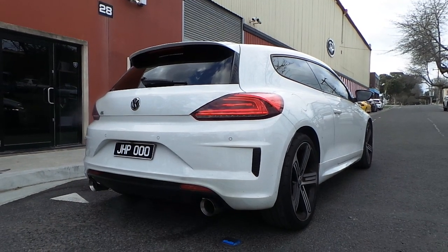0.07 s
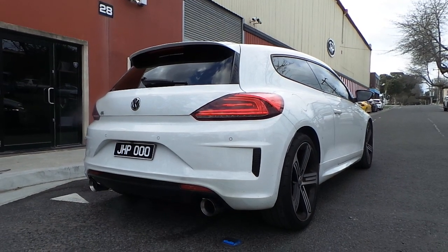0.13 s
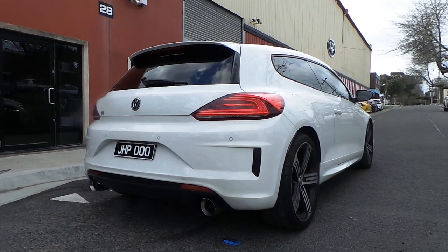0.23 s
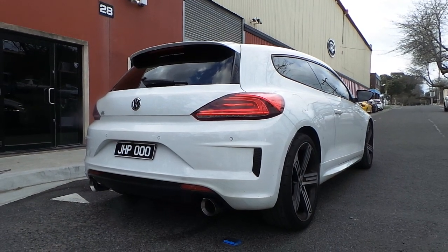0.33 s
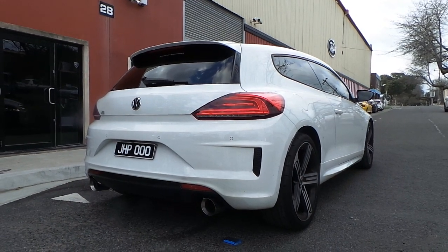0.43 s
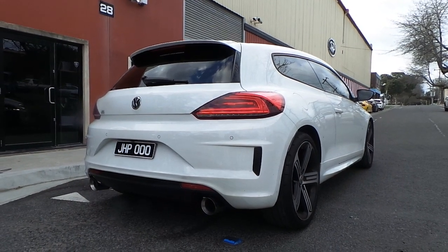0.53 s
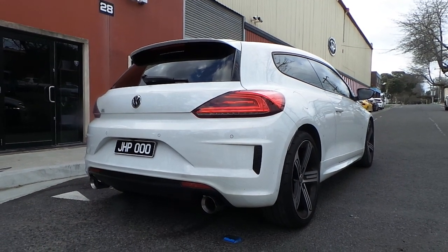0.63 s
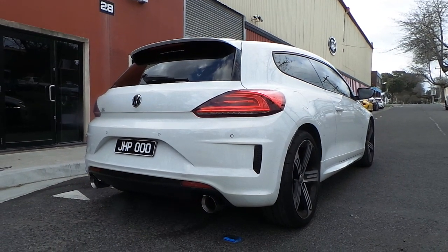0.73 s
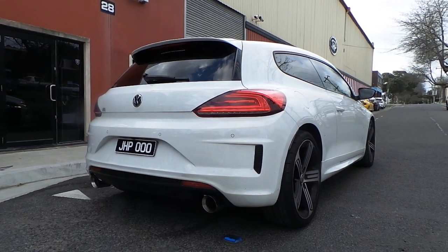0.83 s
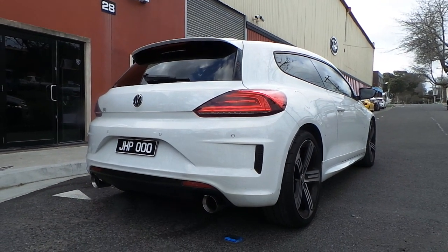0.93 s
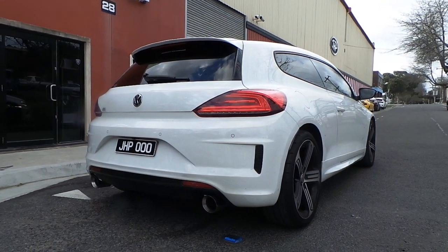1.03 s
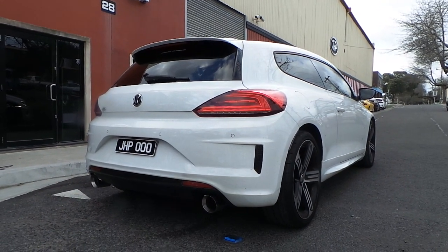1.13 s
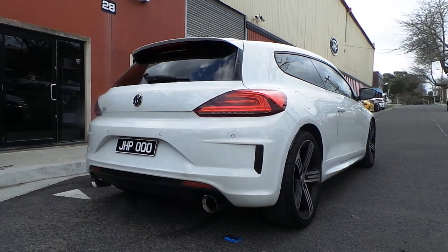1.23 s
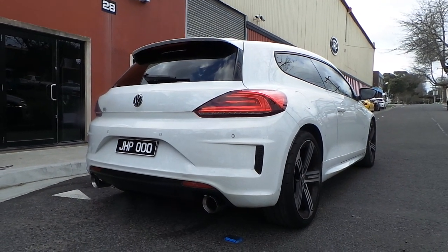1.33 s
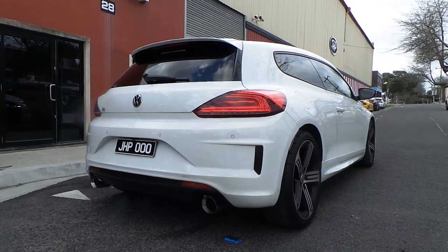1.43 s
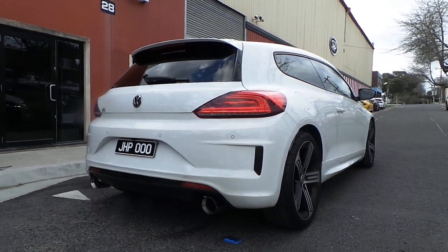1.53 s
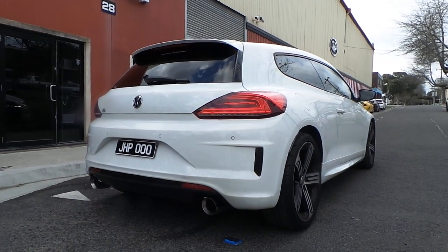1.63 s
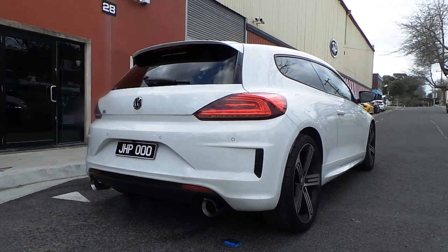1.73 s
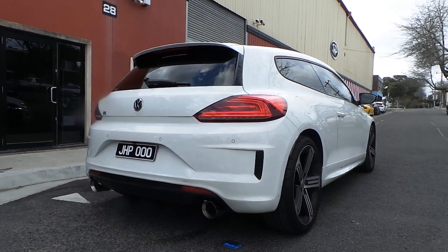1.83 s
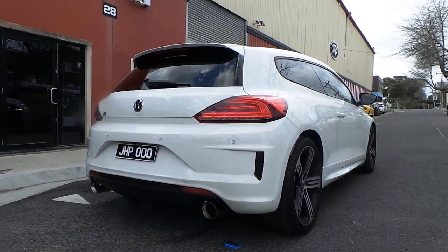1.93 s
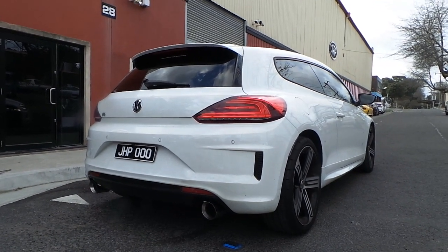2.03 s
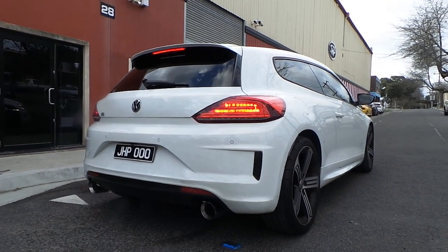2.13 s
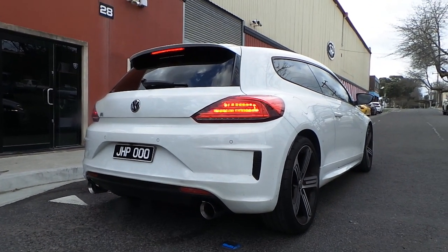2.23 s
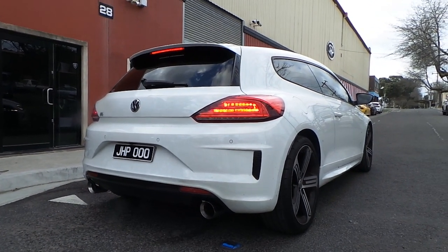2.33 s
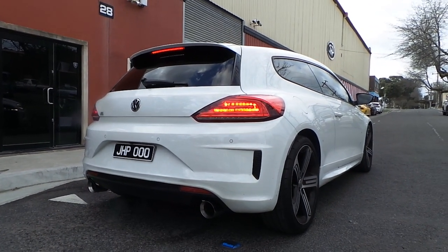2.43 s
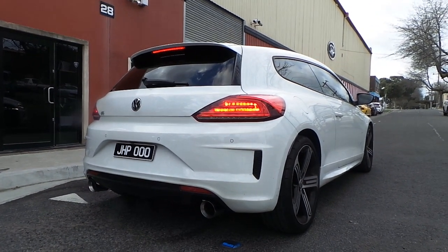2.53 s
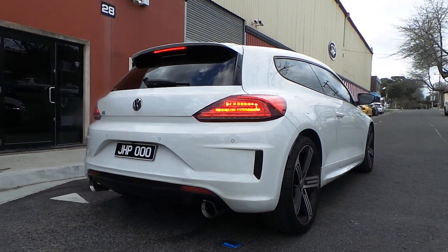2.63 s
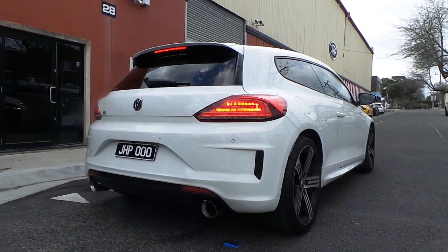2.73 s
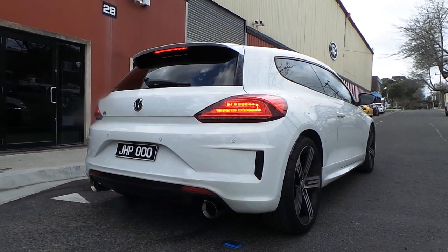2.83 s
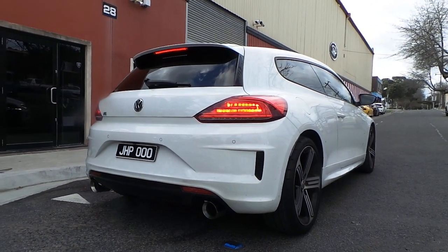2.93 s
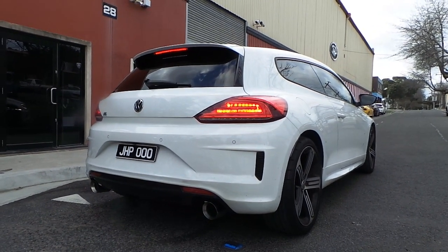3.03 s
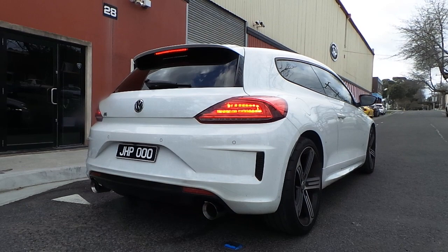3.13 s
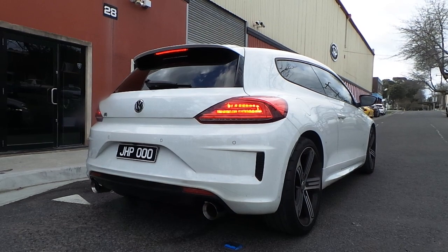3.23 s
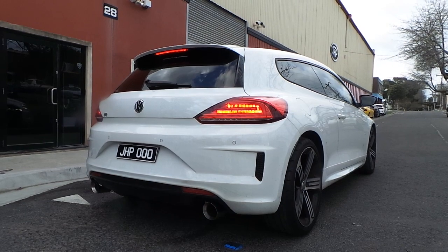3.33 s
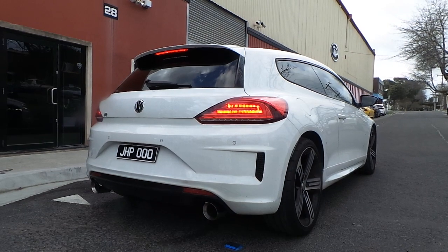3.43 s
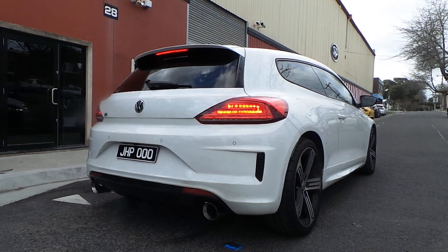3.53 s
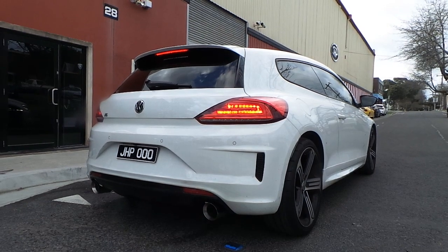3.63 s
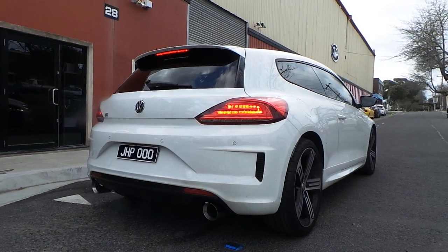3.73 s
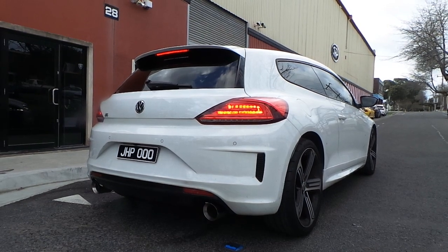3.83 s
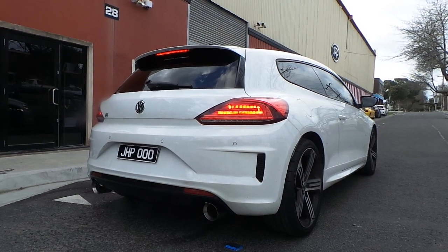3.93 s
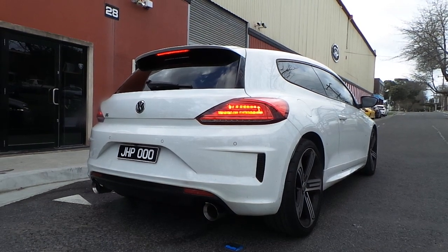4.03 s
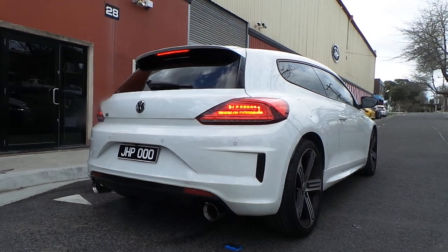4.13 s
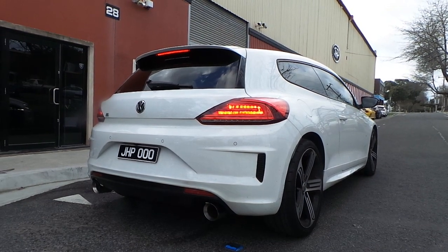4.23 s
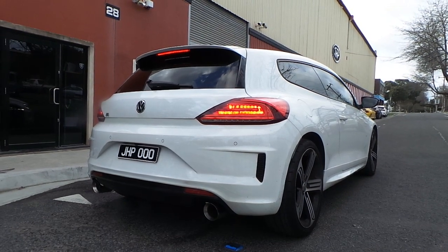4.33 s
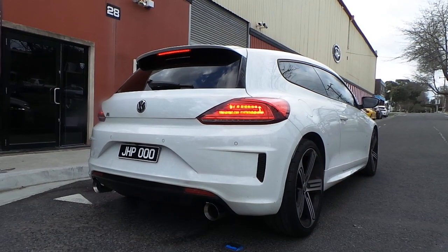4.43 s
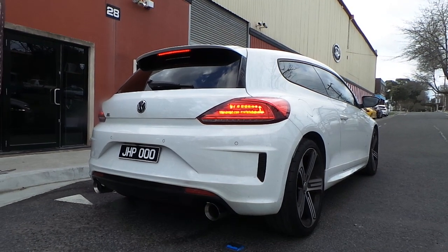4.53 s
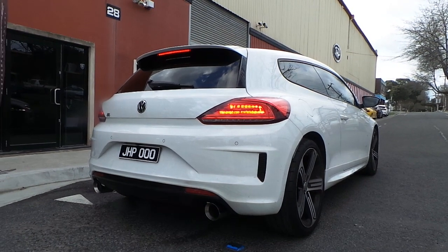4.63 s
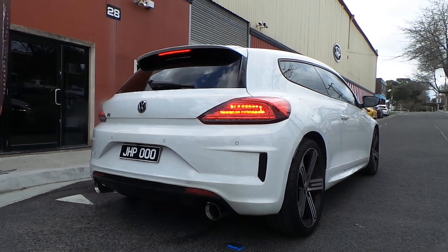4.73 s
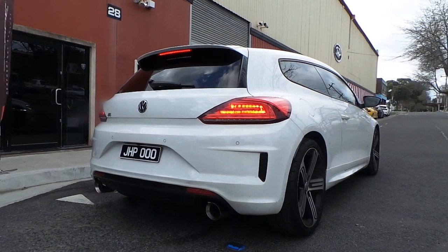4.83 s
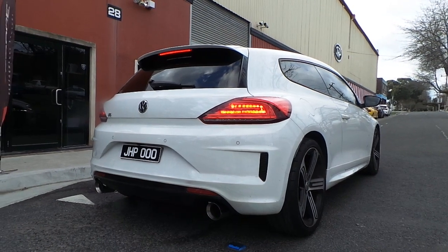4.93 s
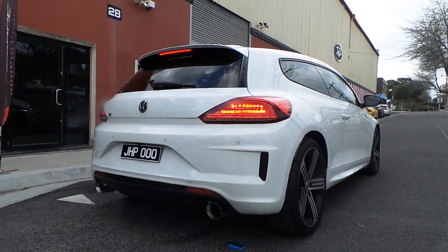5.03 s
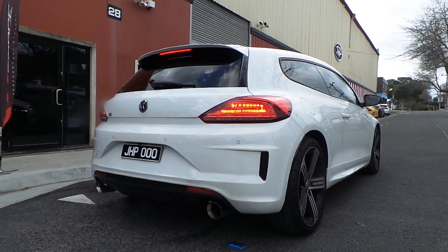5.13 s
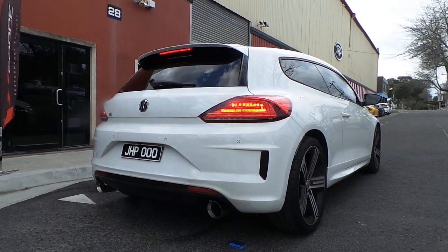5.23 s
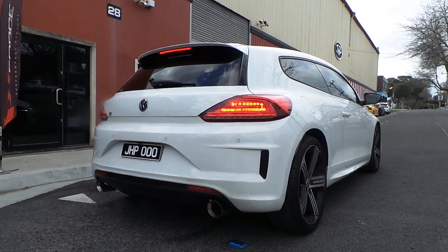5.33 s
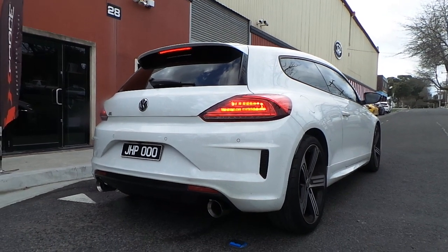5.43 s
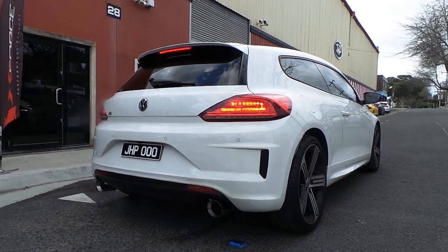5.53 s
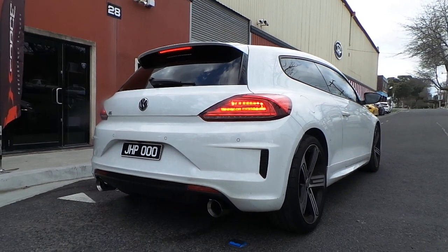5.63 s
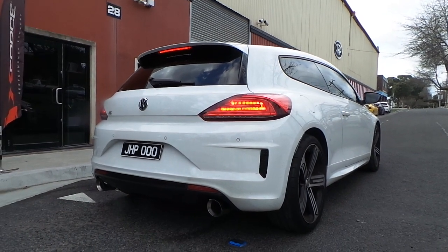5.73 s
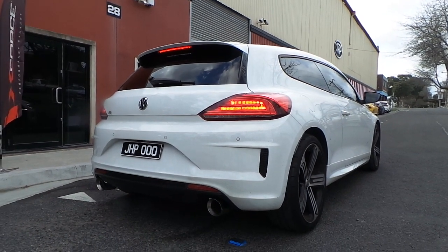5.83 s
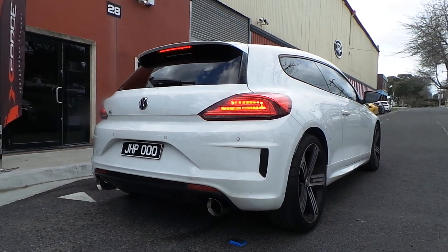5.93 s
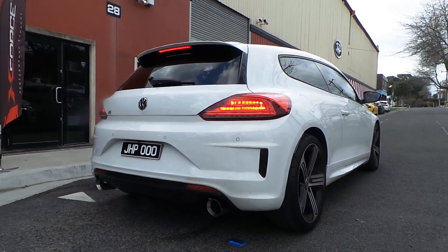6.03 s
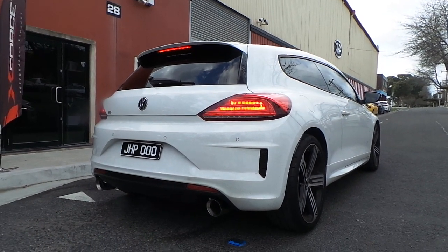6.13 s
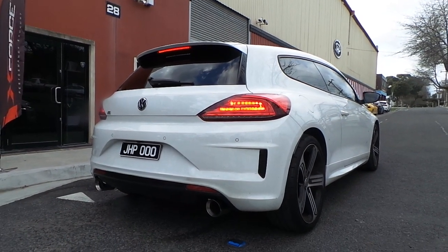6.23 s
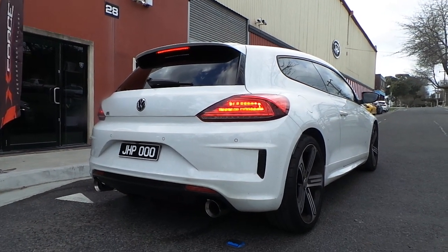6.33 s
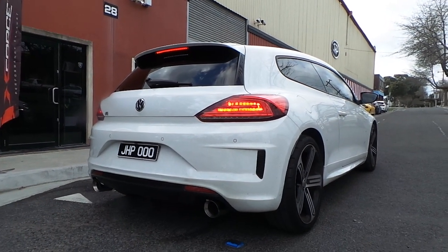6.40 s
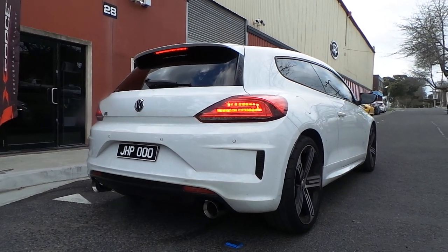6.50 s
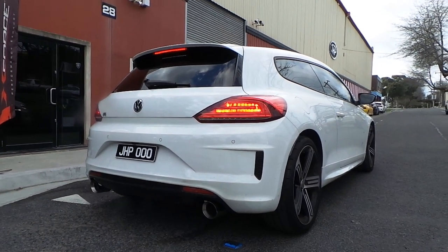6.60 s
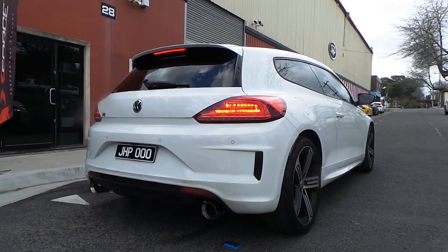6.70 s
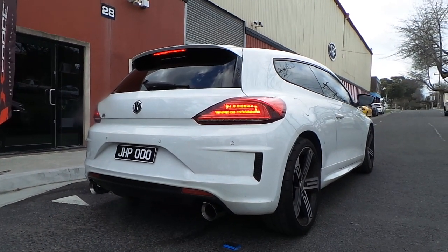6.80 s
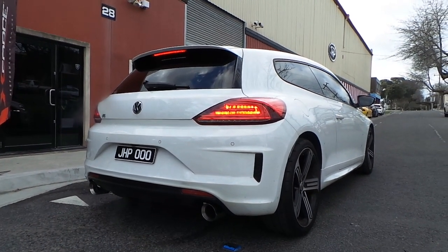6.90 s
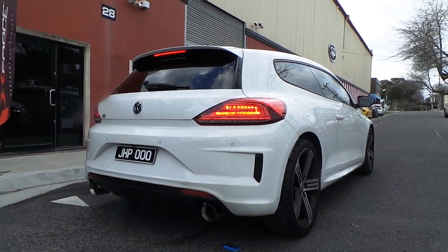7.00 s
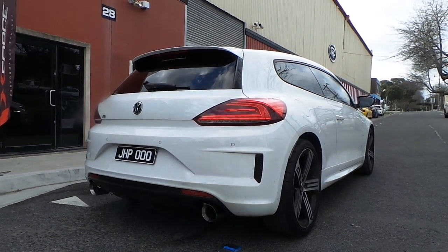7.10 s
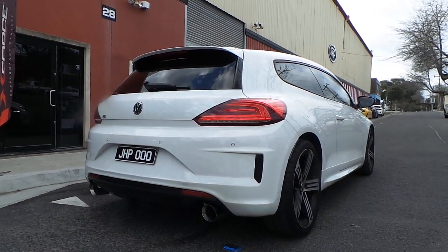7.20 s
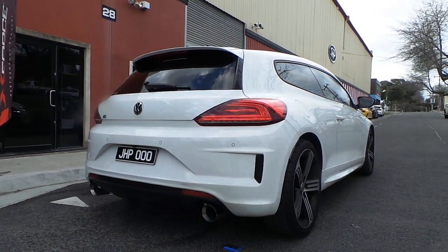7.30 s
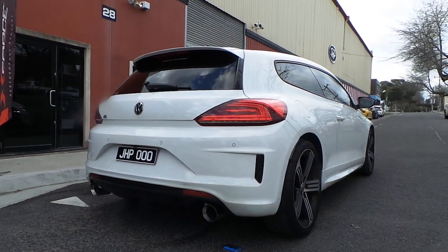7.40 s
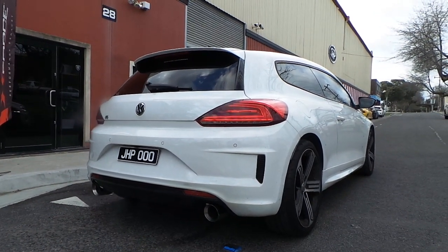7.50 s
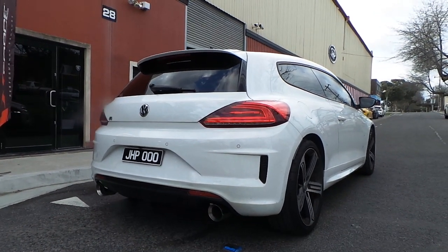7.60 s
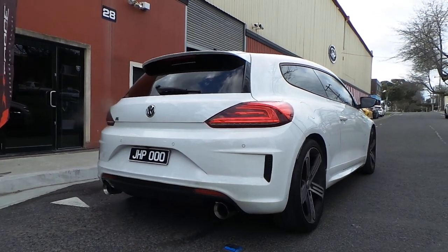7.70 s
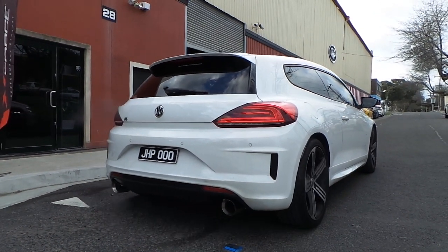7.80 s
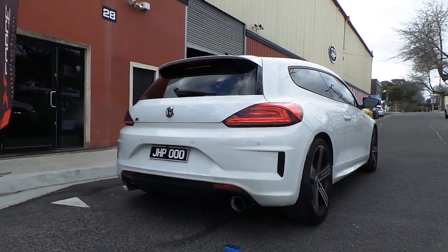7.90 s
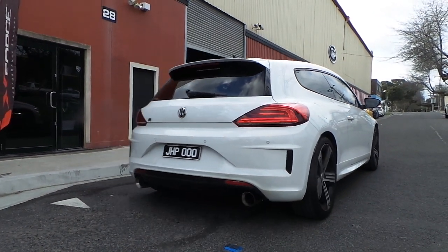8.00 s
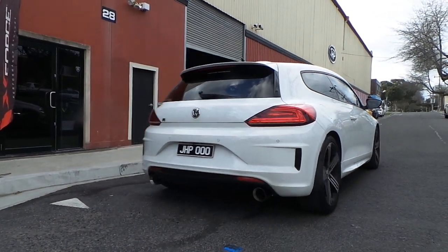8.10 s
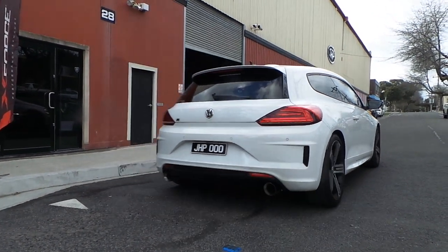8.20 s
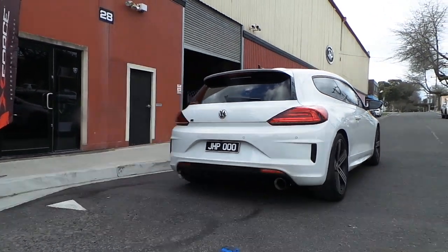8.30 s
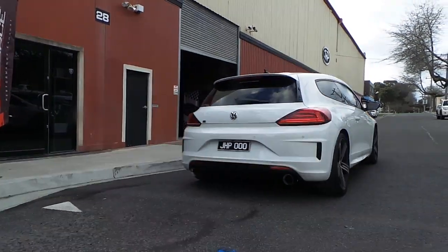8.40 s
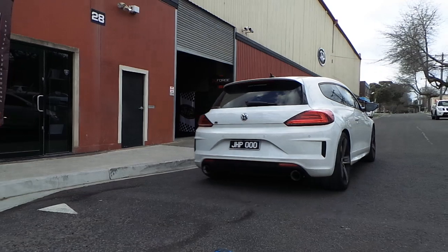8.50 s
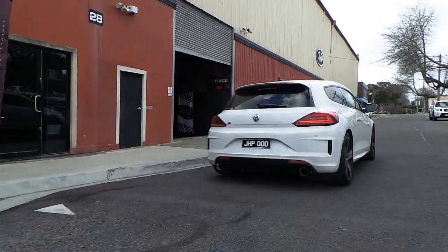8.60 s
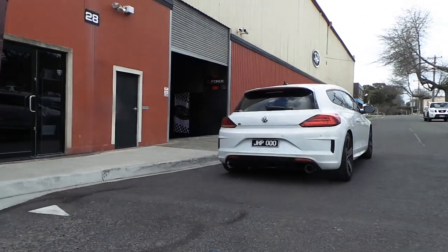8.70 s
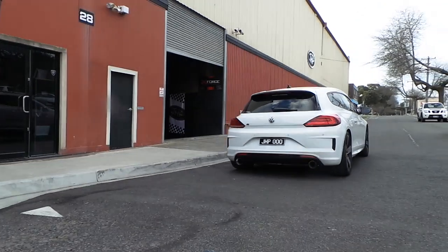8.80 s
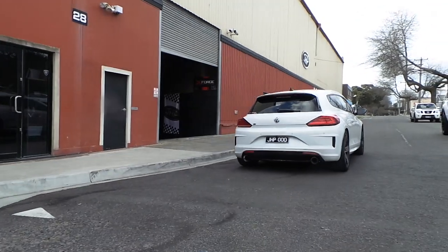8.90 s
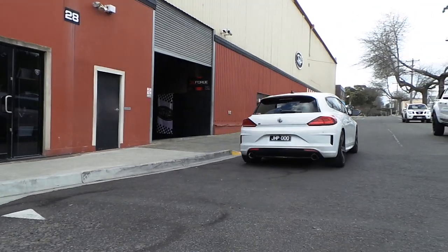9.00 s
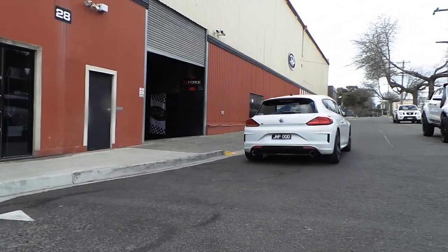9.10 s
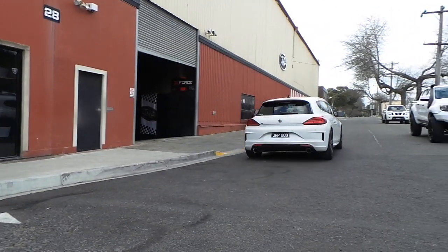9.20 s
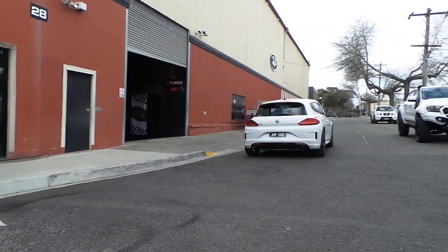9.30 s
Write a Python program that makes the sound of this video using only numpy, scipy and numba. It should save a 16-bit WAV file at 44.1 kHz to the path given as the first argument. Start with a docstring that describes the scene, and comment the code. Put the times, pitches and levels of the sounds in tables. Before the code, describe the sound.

Heard from behind, a hatchback putters at idle in the street, a gear knocks in, revs rise, and it accelerates off with a throaty rasp.

```python
"""First comes the uneven putter of a four-cylinder hatchback idling in the street, heard from behind.
A gear clunks in, the revs lift, then the car pulls away with a booming, rasping exhaust.
Trains of firing pulses ring the silencer and pipes; swept tones make the boom, shaped noise the whir and hiss.
Decaying bursts make puffs, clunks and squeaks; a bird chirps in gliding tones, and walls answer briefly."""
import sys
import numpy as np
from scipy import signal
from scipy.fft import rfft, irfft, next_fast_len
from scipy.io import wavfile
from scipy.ndimage import uniform_filter1d, minimum_filter1d, map_coordinates
from numba import njit

SR = 44100
rng = np.random.default_rng(int(sys.argv[2]) if len(sys.argv) > 2 else 0)


def store_wav(level_fs):
    """Save 16-bit WAV to argv[1]."""
    pcm = np.round(np.clip(np.atleast_2d(level_fs), -1, 1) * 32767)
    wavfile.write(sys.argv[1], SR, pcm.T.astype(np.int16))


N = 412334

# engine speed: [t/s, firing rate f/Hz]
SPEED = [(0.0, 25.7), (2.25, 25.02), (2.97, 25.74), (3.74, 24.71), (4.21, 26.08), (5.02, 24.88),
         (5.79, 25.64), (6.22, 32.42), (6.51, 34.35), (6.95, 33.87), (7.42, 35.12), (7.61, 44.96),
         (7.73, 43.49), (8.42, 52.98), (9.06, 65.9), (9.35, 79.97)]
# throttle openings: [opens t/s, closes t/s, lift of the putter level/dB before it sags]
THROTTLE = [(3.92, 4.4, 5), (5.76, 7.125, 10), (7.255, 9.4, 13)]
# loudness of the rasp as the car pulls away and recedes: [t/s, level/dB]
LOUDNESS = [(7.4, -36.5), (7.56, -29.5), (7.95, -27.5), (8.1, -28.5), (8.32, -26), (8.62, -24.5),
            (8.88, -36), (9.12, -34), (9.3, -30.5)]
# what the silencer lets through: [f/Hz, level/dB]
SILENCER = [(15, -42), (25, -15), (50, -0.5), (72, -9), (102, 7), (130, 5.5), (155, -1), (180, -11),
            (205, -17), (240, -25.5), (280, -26.5), (400, -38.5), (600, -71), (1200, -77)]
# resonances of the silencer box: [f/Hz, width f/Hz, relative level/dB]
BOX = [(186, 62, -2.5), (244.4, 35.4, -0.5), (287, 22, -10), (371, 22, -12), (451, 28, -13)]
# boom response of the exhaust, swept through by each firing order: [f/Hz, level/dB]
BOOM_RESPONSE = [(40, -24), (48, -15.8), (60, -22.5), (72, -32.5), (90, -16.5), (115, -3), (165, -1.55),
                 (195, -11), (228, -13), (258, -5.5), (280, -9.5), (400, -29)]
# firing orders, from the first up: [cruise level/dB, level/dB per doubling of speed]
BOOM_ORDERS = [(-0.5, 0), (-3, -4), (-10.3, -4.5), (-19, 5.5), (-23.5, 17)]
# pipe resonances, low, upper and top: [f/Hz, width f/Hz, relative level/dB]
PIPE = [(264.5, 14, 10), (300.7, 7.5, 11), (366.4, 9.3, 0), (430, 43, -4), (517, 25.7, -7), (613, 19, -7.5),
        (653, 32, -18.5)]
TAILPIPE = [(872, 21, 8.4), (975, 33, 5.5), (1068, 29, 3)]
BLARE = [(1334, 200, 2), (1520, 190, -1.5), (1730, 320, -6.5), (2400, 190, -4), (2630, 1030, -10.5)]
# the rasp brightens with gas flow: [t/s, centre f/Hz]
FLOW = [(7.4, 403), (7.75, 427), (8.0, 430), (8.15, 483), (8.3, 600), (8.5, 578), (8.75, 560), (9.3, 517)]
# engine bay resonances: [f/Hz, width f/Hz, relative level/dB]
BAY = [(497, 18, 2), (958, 57, -3.5), (1058, 52, -4), (1365, 39, 0.5), (1936, 26, -5), (2730, 62, -12)]
# tone of the whir, also used for gas puffs: [f/Hz, relative level/dB]
MACHINERY = [(60, -1.5), (150, 2.5), (230, 5.5), (330, -1), (480, -5), (680, -7), (800, -12.5), (1000, -11),
             (1600, -14), (2400, -16.5), (3200, -23.5), (4500, -33.5), (8000, -43), (14000, -43)]
# tone of the gas hiss: [f/Hz, relative level/dB]
HISS = [(800, -38.5), (2000, -2.5), (3000, 4.5), (4500, 3), (5600, 0), (7000, -0.5), (10000, -3),
        (11500, -8.5), (13000, -13.5), (14400, -22)]
# uneven burns: [t/s, thump level/dB before a shared boost, gas noise level/dB]
PUFFS = [(1.598, -36, -41), (2.493, -34, -34), (2.573, -25.5, -37), (4.175, -34, -37), (5.088, -25, -38)]
# gear lever and driveline clunks: [t/s, thud level/dB, knock level/dB, rattle level/dB]
CLUNKS = [(3.208, -33.5, -31.5, -41), (3.5, -39, -59, -64), (3.542, -31.5, -39, -49),
          (3.567, -38.5, -54, -47.5)]
# driveline resonances: [f/Hz, width f/Hz, relative level/dB]
DRIVELINE = [(463, 42, 2), (550, 130, 0), (680, 51, -9.5)]
# tone of the gearbox knock: [f/Hz, relative level/dB]
KNOCK = [(300, -21), (460, 9.5), (700, -8), (980, 8.5), (1150, -21), (2500, -21), (4000, -54.5)]
# tone of the loose rattle, also used for valve ticks: [f/Hz, relative level/dB]
RATTLE = [(500, -13.5), (1200, -0.5), (3000, -1), (4200, -4), (5500, -5.5), (8000, -13), (11000, -9),
          (14000, -39)]
# small metal squeaks and pings: [t/s, f/Hz, level/dB, time to fall by 60 dB t/s]
SQUEAKS = [(2.838, 7200, -45, 0.18), (2.874, 7040, -39.5, 0.064), (3.569, 7150, -50, .1),
           (3.572, 2760, -49, 0.59), (8.425, 1780, -27.5, 0.088), (8.46, 1835, -25, 0.08)]
# bird chirps: [t/s, length t/s, centre f/Hz, swing f/Hz, level/dB]
CHIRPS = [(1.481, .056, 3780, 280, -49), (1.546, .06, 3020, 40, -57)]

OPEN_S, CLOSE_S, SAG_DB_PER_S = 0.24, 0.16, 1  # each opening swells, sags while held and drops
CLUTCH_S, BITE_S = 7.36, 0.28  # when the clutch starts to take up the load, and how long that takes
CRUISE_DB, CRUISE_HZ = -29.5, 51.2  # middling rasp loudness and firing rate under load
PUTTER_DB, IDLE_HZ = -31.5, 25  # exhaust level and reference firing rate at idle
FRONT_DB = -18  # the bare front of each pulse, beside the pipe's ringing
BOOM_PER_LOUDNESS = .03  # dB of boom per dB of rasp loudness
# upper pipe voices: level, dB per dB of rasp loudness, dB per doubling of speed
RING_DB, RING_PER_LOUDNESS, RING_DB_PER_OCTAVE = -42, .4, 20
BLARE_DB, BLARE_PER_LOUDNESS, BLARE_DB_PER_OCTAVE = -42, 0.58, -0.5
# bay and hiss: idle level, dB per doubling of speed, level under load, dB per dB of rasp loudness
BAY_DB, BAY_DB_PER_OCTAVE, BAY_LOAD_DB, BAY_PER_LOUDNESS = -47.5, 3.5, -40, 0.29
HISS_DB, HISS_DB_PER_OCTAVE, HISS_LOAD_DB, HISS_PER_LOUDNESS = -58, 8.5, -46, 0.48
SWELL_S, SWELL_WIDTH_S, SWELL_DB = 6, 0.45, 2  # whir and hiss swell as the revs first pick up
TOP_HZ = 14450  # upper limit of the final sound


def amp(db):
    """Turn decibels into a gain."""
    return 10 ** (np.asarray(db) / 20)


def unit(x):
    """Scale a sound to an average (rms) level of 1."""
    return x / np.sqrt(np.mean(x ** 2) + 1e-20)


def clock():
    """Time of every sample, in seconds."""
    return np.arange(N) / SR


def curves(rows):
    """Join table rows by straight lines: one curve for each column after the time."""
    s, *cols = np.transpose(rows)
    return [np.interp(clock(), s, c) for c in cols]


def wobble(rate):
    """A smooth random curve with the given number of random points a second."""
    points = rng.standard_normal(int(N * rate / SR) + 4)
    return unit(map_coordinates(points, [np.arange(N) * rate / SR], order=2))


def grid():
    """Frequencies at which every filter response is given."""
    return np.fft.rfftfreq(2 * next_fast_len(N // 2 + SR // 2), 1 / SR)


def filtered(x, response):
    """Filter a sound by multiplying its spectrum with a response."""
    return irfft(rfft(x, 2 * len(response) - 2) * response)[:N]


def colour(points):
    """A filter through (f/Hz, level/dB) points that never rings before its cause."""
    hz, db = np.transpose(points)
    cepstrum = irfft(np.log(amp(np.interp(np.log(grid() + 1), np.log(hz), db))))
    half = len(cepstrum) // 2
    # folding the cepstrum onto positive time makes the filter causal
    folded = np.r_[cepstrum[0], 2 * cepstrum[1:half], np.zeros(half)]
    return np.exp(rfft(folded))


def modes(rows):
    """Add up resonances that each ring after a push, with alternating sign."""
    f = grid()
    return sum((-1) ** k * amp(db) * 1j * f * width / (centre * centre - f * f + 1j * f * width)
               for k, (centre, width, db) in enumerate(rows))


def noise(response):
    """Filtered random noise with an rms level of 1."""
    return unit(filtered(rng.standard_normal(N), response))


def steady(x):
    """Even out the slow level to about rms 1, keeping the single beats."""
    size = SR // 12
    power = uniform_filter1d(uniform_filter1d(x * x, size), size)
    return x / np.sqrt(np.abs(power) + 1e-12)


def burst(s, attack, t60):
    """Level of a blow at time s: a quick rise, then a fall of 60 dB every t60 seconds."""
    t = np.maximum(clock() - s, 0)
    return (1 - np.exp(-t / attack)) * amp(-60 * t / t60)


@njit
def swept(x, step, damping):
    """A resonance whose centre moves (step in radians per sample)."""
    out, low, band = np.zeros(len(x)), 0.0, 0.0
    for i in range(len(x)):
        low += step[i] * band
        band += step[i] * (x[i] - low - damping * band)
        out[i] = band
    return out


def throttle():
    """Lift of the putter in dB: every throttle opening swells, sags and drops."""
    t = clock()
    lift_db = np.zeros(N)
    for on, off, db in THROTTLE:
        opening = np.clip((t - on) / OPEN_S, 0, 1)
        closing = np.clip(1 - (t - off) / CLOSE_S, 0, 1)
        lift_db += (db - SAG_DB_PER_S * (t - on)) * opening * closing
    return lift_db


def firings(turn, scatter_db, uneven_db, jitter_s):
    """One pulse per firing; the four cylinders differ in strength, and chance shifts each pulse."""
    at = np.flatnonzero(np.diff(np.floor(turn)) > 0)
    chance = rng.standard_normal((len(at), 2))
    cylinder = np.resize([1.0, 0.087, 0.9, -1.2], len(at))
    at = np.clip(at + np.round(jitter_s * SR * chance[:, 1]).astype(int), 0, N - 1)
    return np.bincount(at, amp(scatter_db * chance[:, 0] + uneven_db * cylinder), N)


def blowdown(turn, pulses, rough, fade_db):
    """Mix pulses with a noisy gas jet that fades by fade_db from one firing to the next."""
    jet = rng.standard_normal(N) * amp(-fade_db * (turn % 1))
    rough = np.clip(rough, 0, 1)
    return np.sqrt(1 - rough) * steady(pulses) + np.sqrt(rough) * steady(jet)


def exhaust(turn, firing_hz, load, lift_db, loudness_db):
    """Separate putts ring the silencer at idle and give way to clean booming orders under load."""
    silencer = -colour(SILENCER)
    pulses = firings(turn, scatter_db=1.1, uneven_db=.25, jitter_s=.00012)
    putts = steady(filtered(pulses, silencer))
    # gas flutters in the silencer, and faster putts start to ring its box
    flutter = amp(-15) * noise(silencer)
    chuff = steady(filtered(blowdown(turn, pulses, rough=.1, fade_db=12), modes(BOX)))
    chuff_db = np.interp(firing_hz, [25, 34], [-28, -14])
    putter = amp(PUTTER_DB + lift_db) * (putts + flutter + amp(chuff_db) * chuff)
    # unequal cylinders make the boom throb at half the firing rate
    throb = amp(.5 * np.cos(np.pi * turn) + 0.61 * wobble(60))
    return (1 - load) * putter + load * throb * boom(turn, firing_hz, loudness_db, silencer)


def boom(turn, firing_hz, loudness_db, silencer):
    """Multiples of the firing rate swell and fade as they climb through the exhaust's resonances."""
    hz, db = np.transpose(BOOM_RESPONSE)
    lag = np.unwrap(np.angle(silencer))
    octaves = np.log2(firing_hz / CRUISE_HZ)
    out = np.zeros(N)
    for order, (order_db, db_per_octave) in enumerate(BOOM_ORDERS, 1):
        order_hz = order * firing_hz
        response_db = np.interp(np.log(order_hz), np.log(hz), db)
        level_db = response_db + order_db + db_per_octave * octaves
        phase = 2 * np.pi * order * turn + np.interp(order_hz, grid(), lag)
        out += amp(level_db) * np.cos(phase)
    return np.sqrt(2) * amp(BOOM_PER_LOUDNESS * loudness_db) * out


def rasp(turn, firing_hz, loudness_db):
    """Pulses and rough gas jets excite the upper pipe resonances under load."""
    octaves = np.log2(firing_hz / CRUISE_HZ)
    rasp_db = CRUISE_DB + loudness_db
    ring_db = RING_DB + RING_PER_LOUDNESS * loudness_db + RING_DB_PER_OCTAVE * octaves
    blare_db = BLARE_DB + BLARE_PER_LOUDNESS * loudness_db + BLARE_DB_PER_OCTAVE * octaves
    step = 2 * np.pi * curves(FLOW)[0] / SR
    pulses = firings(turn, scatter_db=1.1, uneven_db=2, jitter_s=.00006)
    clean = blowdown(turn, pulses, rough=.13, fade_db=12)
    gritty = blowdown(turn, pulses, rough=.38, fade_db=22)
    piped = filtered(clean, modes(PIPE) + amp(FRONT_DB))
    growl = swept(swept(piped, step, 0.35), step, 0.45)
    ring = filtered(gritty, modes(TAILPIPE) * modes([(950, 260, 0)]))
    # the blare follows the growl's moving centre at 3.62 times its frequency
    blare = swept(filtered(gritty, modes(BLARE) * modes([(1660, 2100, 0)])), 3.62 * step, 0.67)
    return amp(rasp_db) * steady(growl) + amp(ring_db) * steady(ring) + amp(blare_db) * steady(blare)


def machinery(turn, firing_hz, load, loudness_db):
    """The engine bay whirs and ticks in time with the firings; gas hisses from the tailpipes."""
    octaves = np.log2(firing_hz / IDLE_HZ)
    bay_idle_db = BAY_DB + BAY_DB_PER_OCTAVE * octaves
    bay_load_db = BAY_LOAD_DB + BAY_PER_LOUDNESS * loudness_db
    bay_db = (1 - load) * bay_idle_db + load * bay_load_db
    hiss_idle_db = HISS_DB + HISS_DB_PER_OCTAVE * octaves
    hiss_load_db = HISS_LOAD_DB + HISS_PER_LOUDNESS * loudness_db
    hiss_db = (1 - load) * hiss_idle_db + load * hiss_load_db
    beat = np.cos(2 * np.pi * (turn - .7))
    # the fan and belt noise flutters a little in level
    unrest = amp(.6 * wobble(25))
    whir = amp(6.0) * unrest * noise(colour(MACHINERY)) + amp(-4.0) * noise(modes(BAY))
    bay = whir * amp(bay_db + 0.73 * beat)
    # under load the hiss peaks at another point of each firing
    surge = (1 - load) * beat + load * np.cos(2 * np.pi * (turn - .25))
    hiss = noise(colour(HISS)) * amp(hiss_db + 1.0 * surge + 0.98 * wobble(40))
    valves = turn + 0.32
    taps = firings(valves, scatter_db=5.5, uneven_db=-1.0, jitter_s=0.0012)
    ticks = blowdown(valves, taps, rough=.9, fade_db=68)
    swell = amp(SWELL_DB * np.exp(-((clock() - SWELL_S) / SWELL_WIDTH_S) ** 2))
    return swell * (bay + hiss) + amp(-71.5) * steady(filtered(ticks, colour(RATTLE)))


def puffs():
    """An uneven burn thumps the silencer at 140 Hz and blows out a puff of noisy gas."""
    thumps = sum(amp(db) * burst(s, 0.0025, 0.14) * np.sin(2 * np.pi * 140 * (clock() - s))
                 for s, db, _ in PUFFS)
    gas = sum(amp(db) * burst(s, 0.0035, 0.37) for s, _, db in PUFFS)
    return amp(7) * thumps + gas * noise(colour(MACHINERY))


def clunks():
    """The gear goes in: short noise bursts make a driveline thud, a gearbox knock and a loose rattle."""
    bodies = np.array([noise(modes(DRIVELINE)), noise(colour(KNOCK)), noise(colour(RATTLE))])
    return sum(burst(s, 0.0019, 0.18) * (amp(dbs) @ bodies) for s, *dbs in CLUNKS)


def squeaks():
    """Small metal parts ring briefly as fading tones with a wavering pitch."""
    drift = 1.1 * wobble(380)  # radians
    return sum(amp(db) * burst(s, 0.0008, t60) * np.sin(2 * np.pi * hz * clock() + drift)
               for s, hz, db, t60 in SQUEAKS)


def bird():
    """Each chirp is a tone that dips and rises once around its centre pitch."""
    out = np.zeros(N)
    for s, length, hz, swing_hz, db in CHIRPS:
        progress = np.clip((clock() - s) / length, 0, 1)
        pitch = hz - swing_hz * np.sin(2 * np.pi * progress)
        envelope = np.sqrt(np.abs(np.sin(np.pi * progress)))
        out += amp(db) * envelope * np.sin(2 * np.pi * np.cumsum(pitch) / SR)
    return out


def street(x, t60, wet_db):
    """The walls answer 22 ms later with a short, blurred echo made by a fading noise tail."""
    tail = rng.standard_normal(N) * burst(0.022, 0.0032, t60)
    return x + amp(wet_db) * signal.fftconvolve(x, tail / np.linalg.norm(tail))[:N]


def scene():
    """Engine speed, throttle and loudness shape the engine layers; short noises and the bird join in."""
    firing_hz, = curves(SPEED)
    # turn counts firings; each leads the sound at the tailpipe by the delay of the exhaust
    turn = np.cumsum(firing_hz) / SR + .0105 * firing_hz - .1
    load = np.clip((clock() - CLUTCH_S) / BITE_S, 0, 1)
    lift_db = throttle()
    loudness_db = curves(LOUDNESS)[0] - CRUISE_DB  # relative to the middling rasp
    engine = exhaust(turn, firing_hz, load, lift_db, loudness_db)
    engine += machinery(turn, firing_hz, load, loudness_db)
    close_sounds = load * rasp(turn, firing_hz, loudness_db) + puffs() + clunks() + squeaks()
    near = street(close_sounds, t60=.25, wet_db=-15)
    far = street(bird(), t60=0.35, wet_db=-3)
    return (engine + near + far)[None]


def record(dry):
    """Ease the gain down around the biggest peaks, then remove everything above TOP_HZ."""
    needed = np.minimum(1, .92 / (np.abs(dry[0]) + 1e-9))
    size = SR // 40
    gain = uniform_filter1d(minimum_filter1d(needed, 2 * size), size)
    return filtered(dry[0] * gain, grid() < TOP_HZ)[None]


dry = scene()
out = record(dry)
store_wav(out)
```